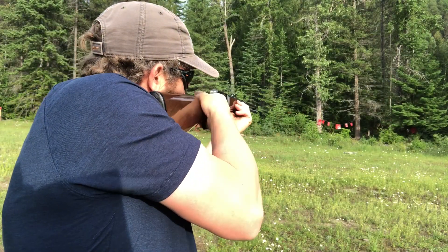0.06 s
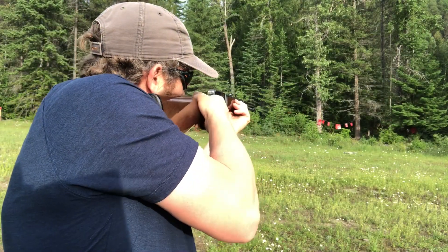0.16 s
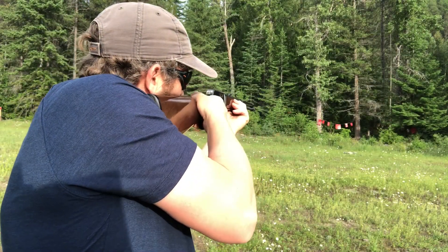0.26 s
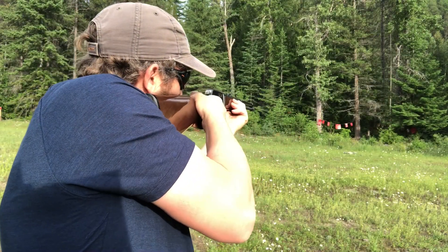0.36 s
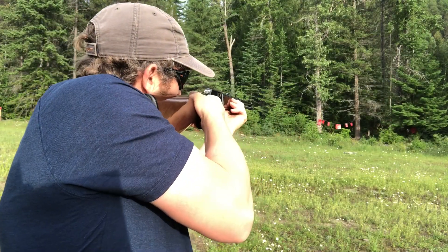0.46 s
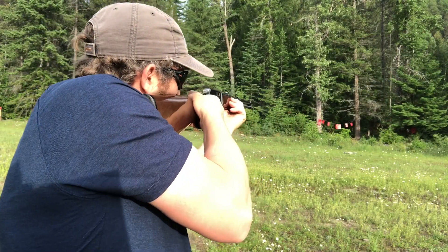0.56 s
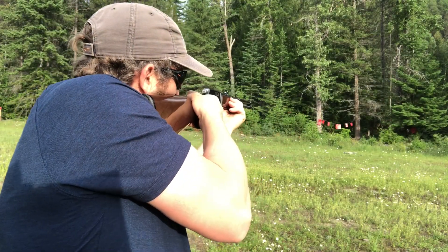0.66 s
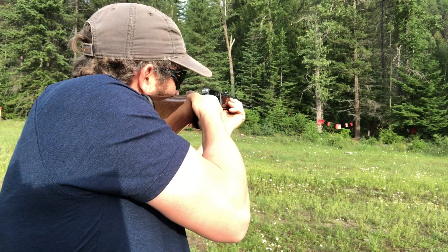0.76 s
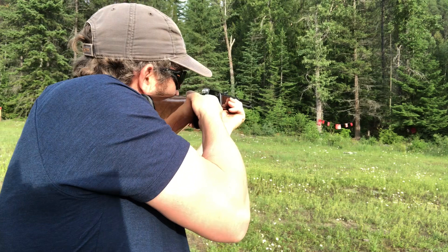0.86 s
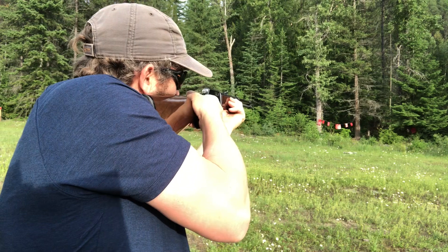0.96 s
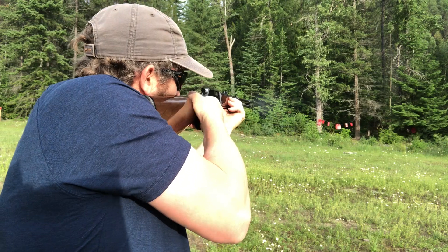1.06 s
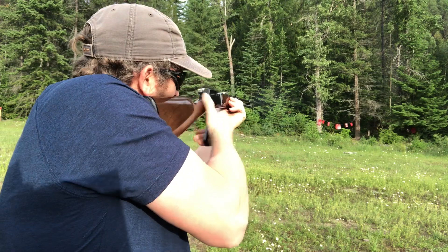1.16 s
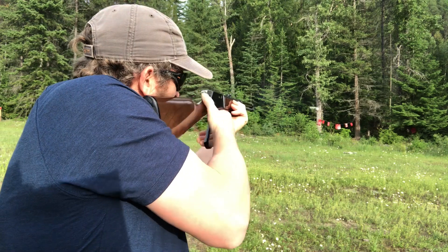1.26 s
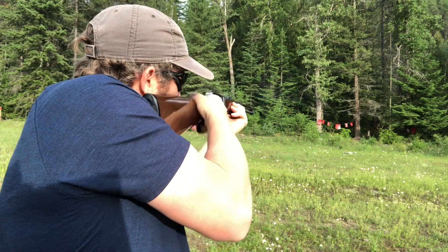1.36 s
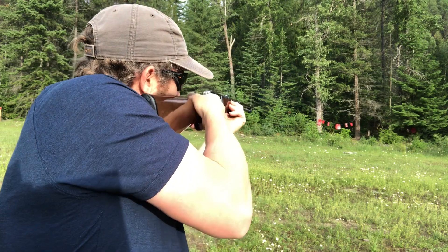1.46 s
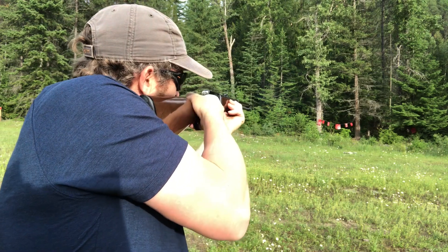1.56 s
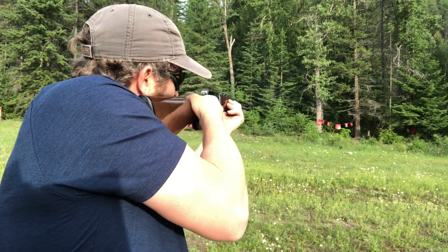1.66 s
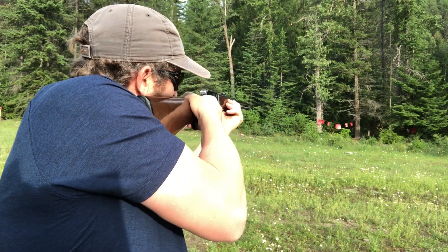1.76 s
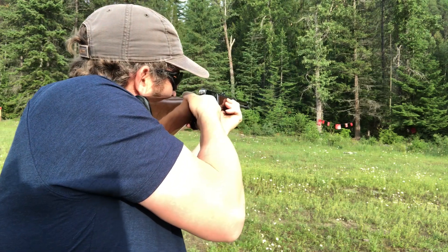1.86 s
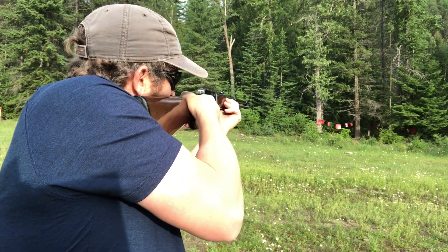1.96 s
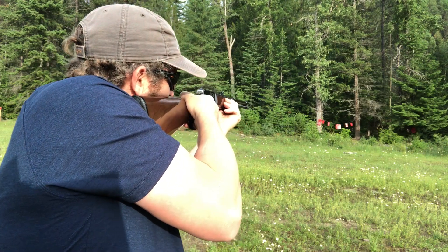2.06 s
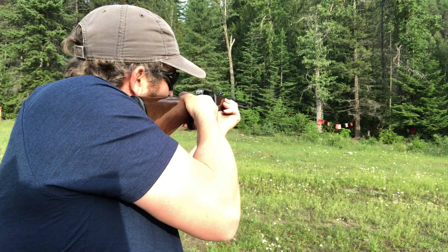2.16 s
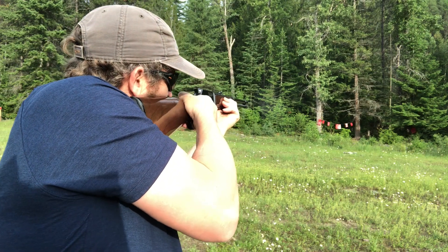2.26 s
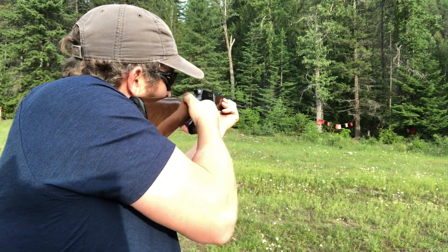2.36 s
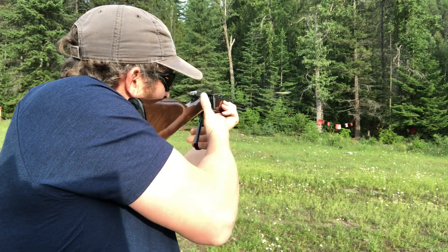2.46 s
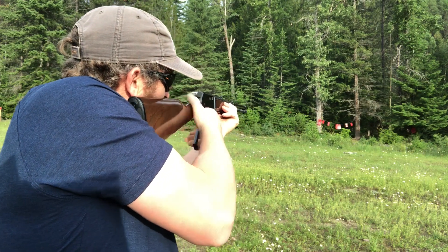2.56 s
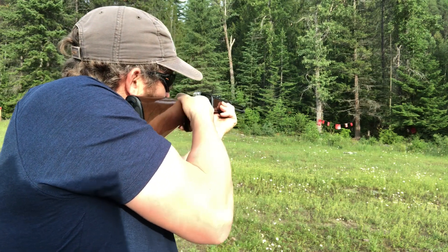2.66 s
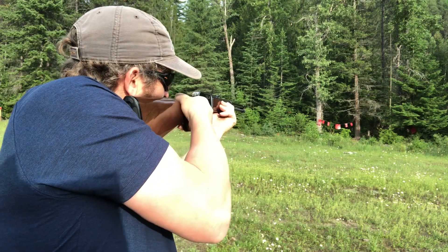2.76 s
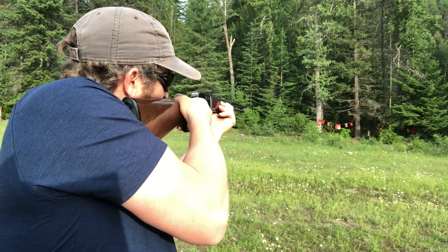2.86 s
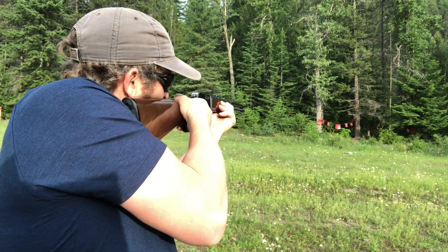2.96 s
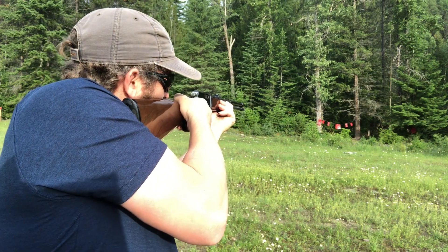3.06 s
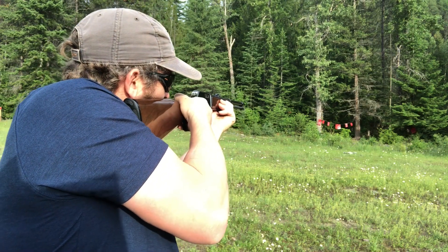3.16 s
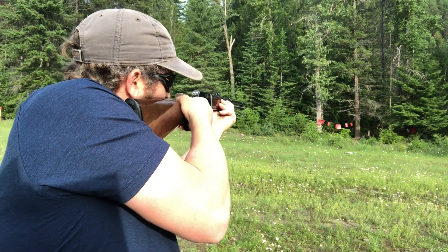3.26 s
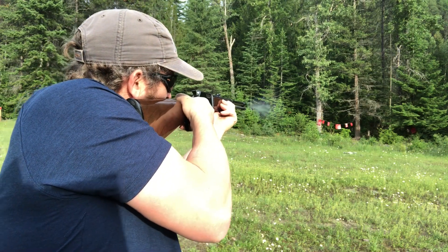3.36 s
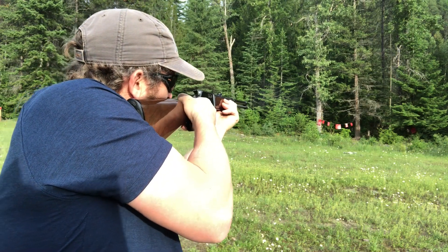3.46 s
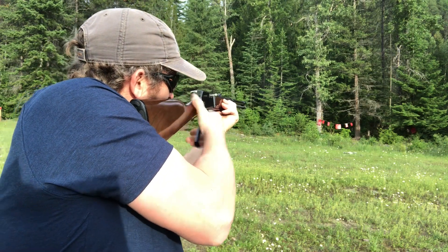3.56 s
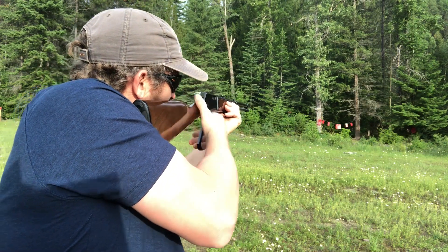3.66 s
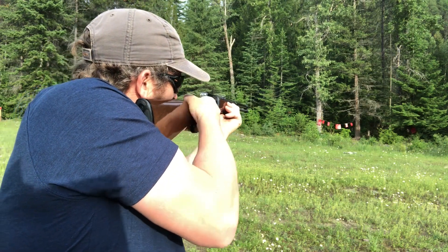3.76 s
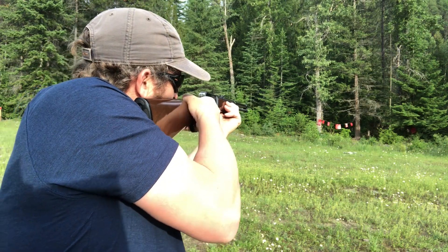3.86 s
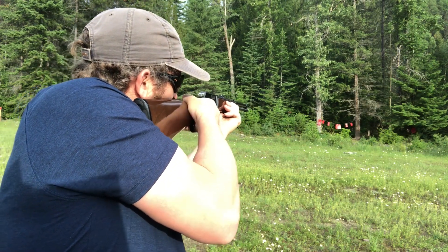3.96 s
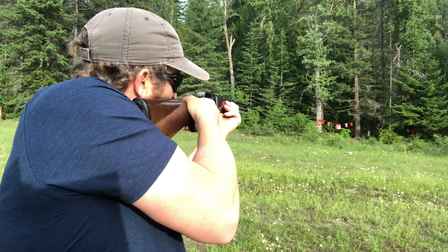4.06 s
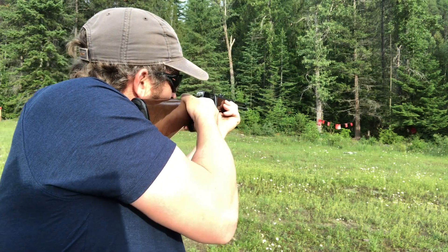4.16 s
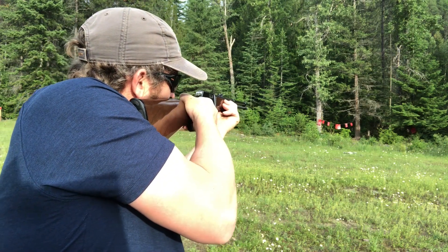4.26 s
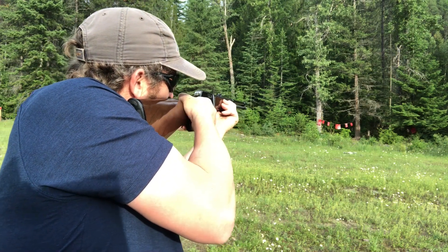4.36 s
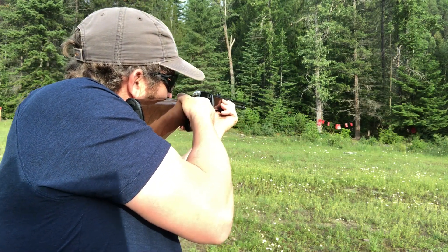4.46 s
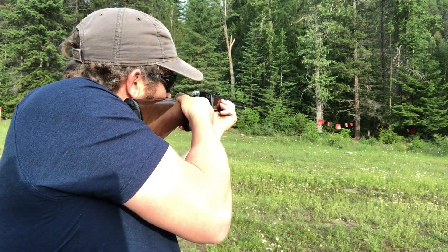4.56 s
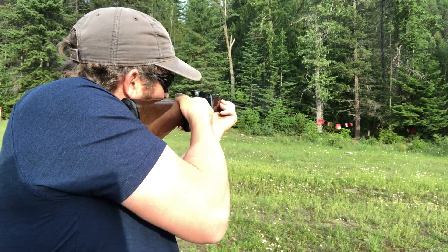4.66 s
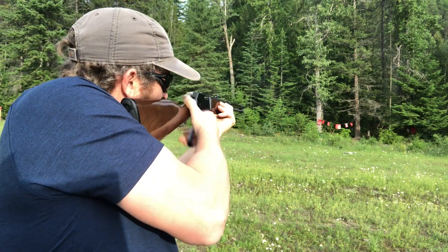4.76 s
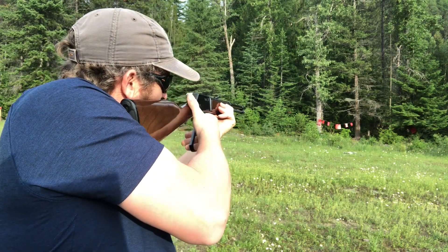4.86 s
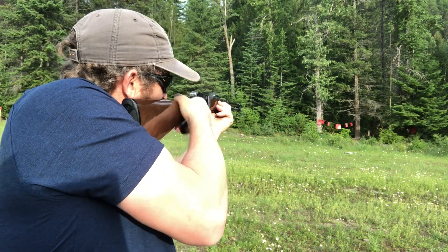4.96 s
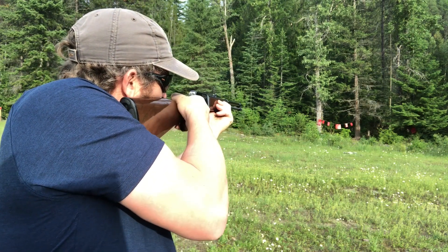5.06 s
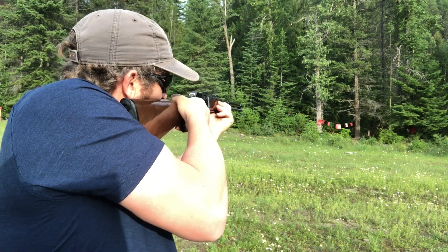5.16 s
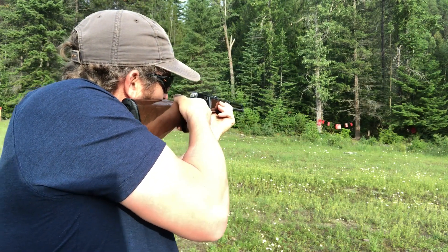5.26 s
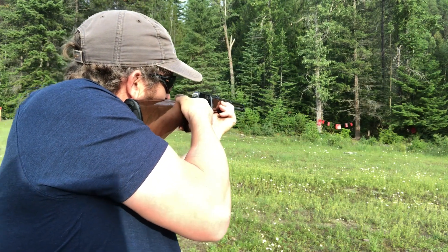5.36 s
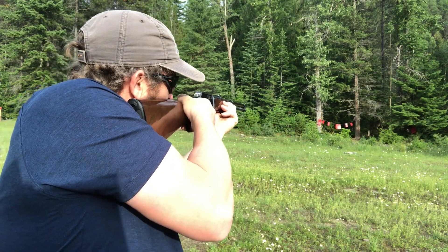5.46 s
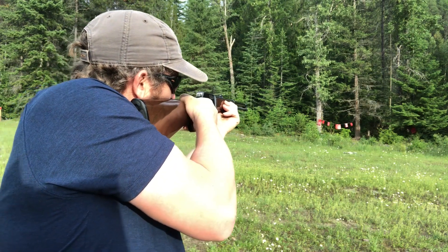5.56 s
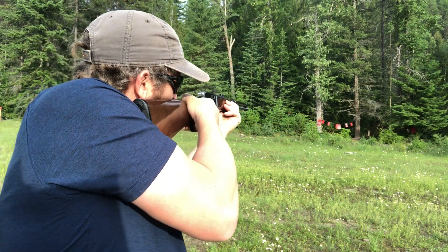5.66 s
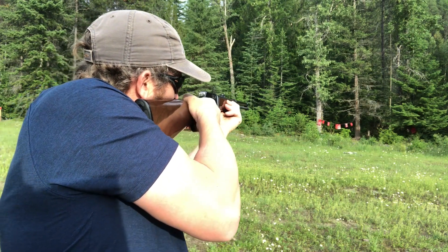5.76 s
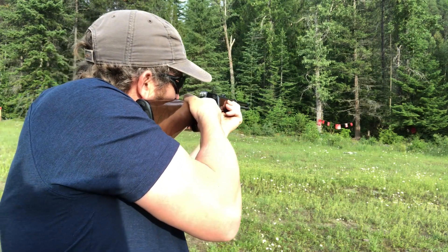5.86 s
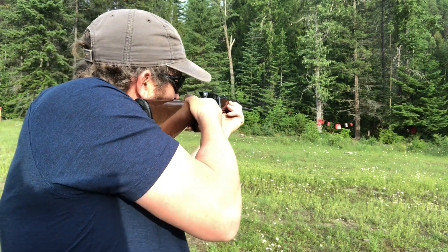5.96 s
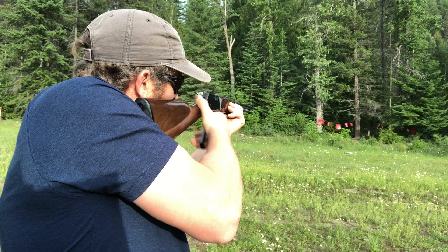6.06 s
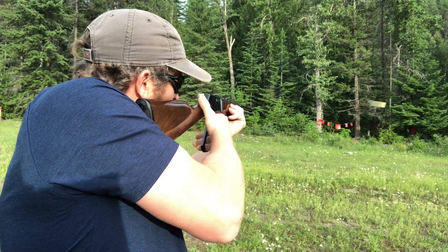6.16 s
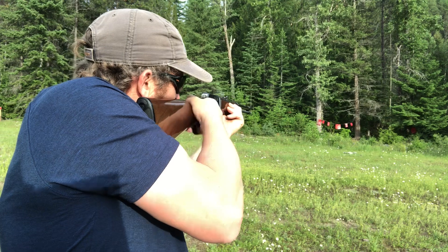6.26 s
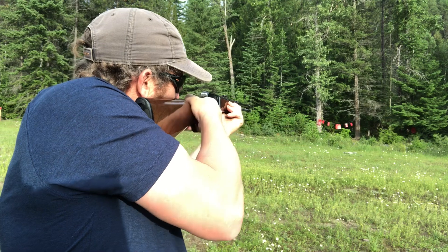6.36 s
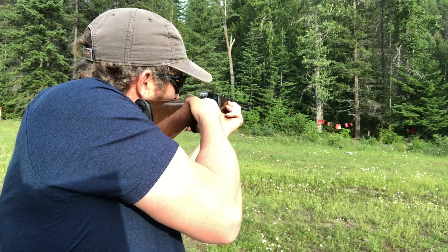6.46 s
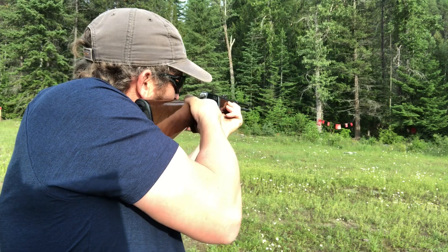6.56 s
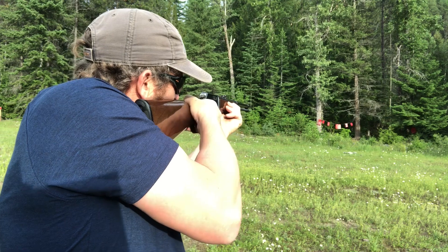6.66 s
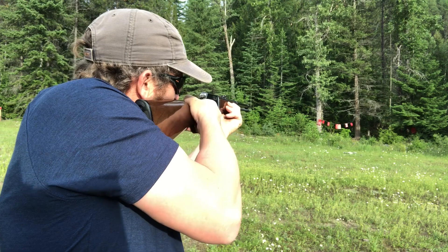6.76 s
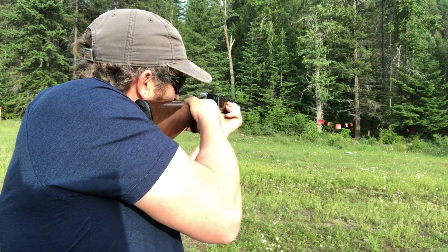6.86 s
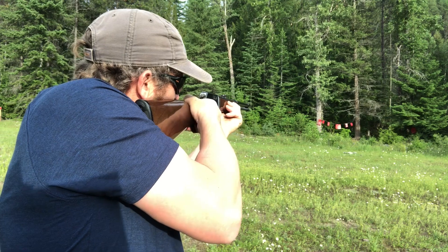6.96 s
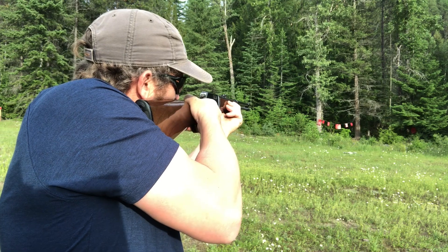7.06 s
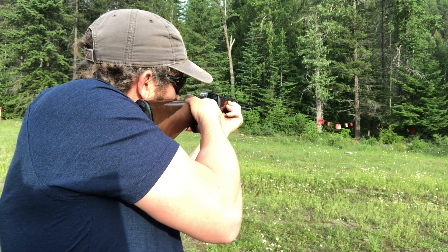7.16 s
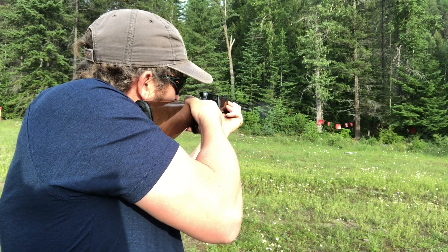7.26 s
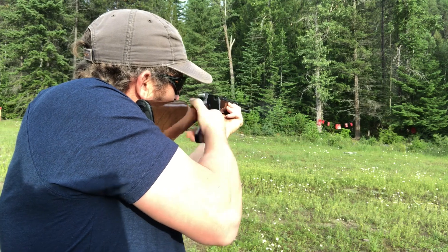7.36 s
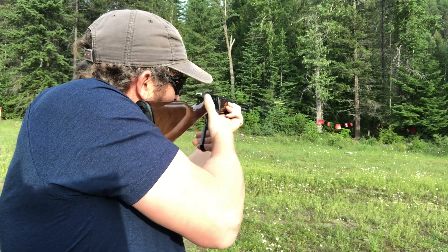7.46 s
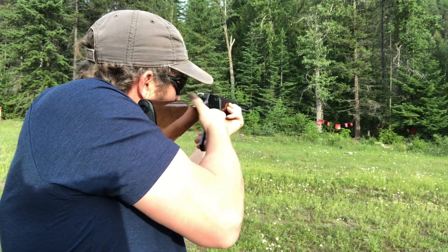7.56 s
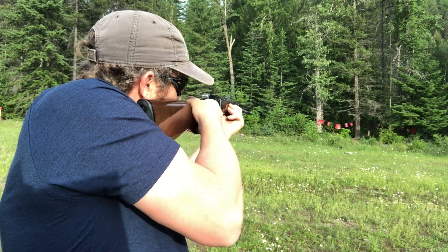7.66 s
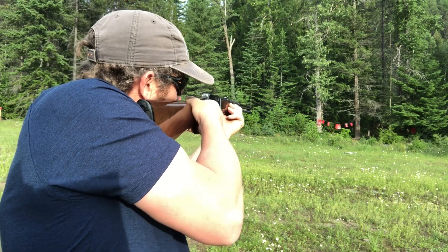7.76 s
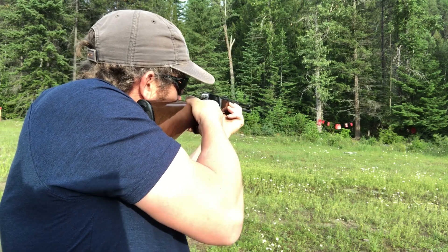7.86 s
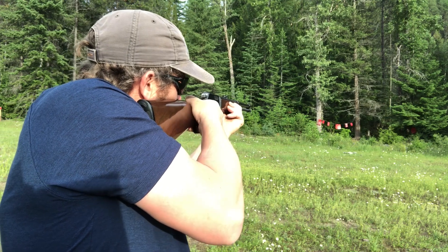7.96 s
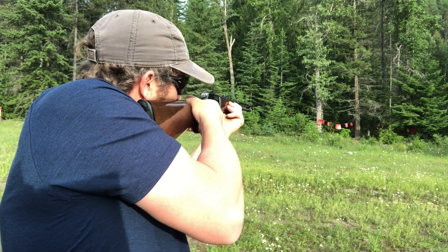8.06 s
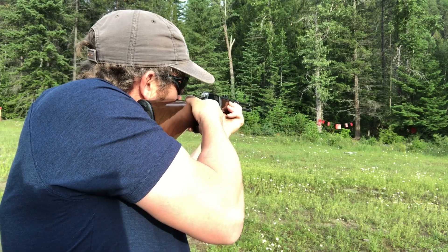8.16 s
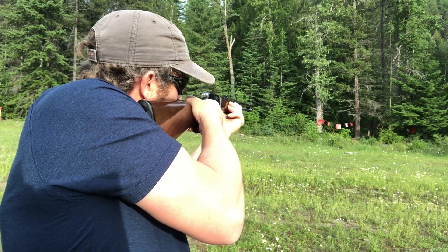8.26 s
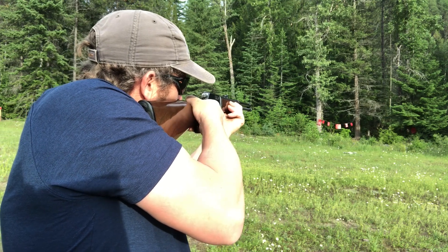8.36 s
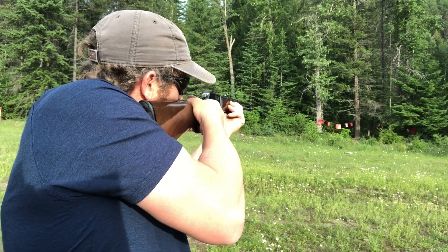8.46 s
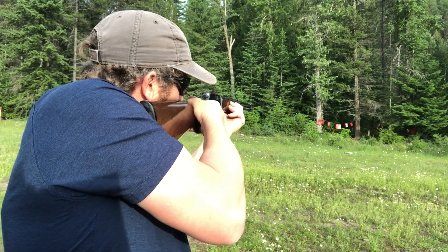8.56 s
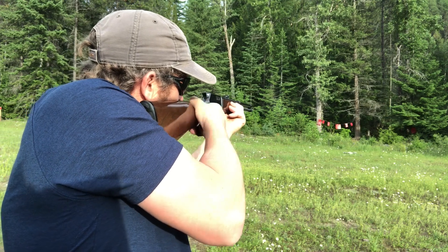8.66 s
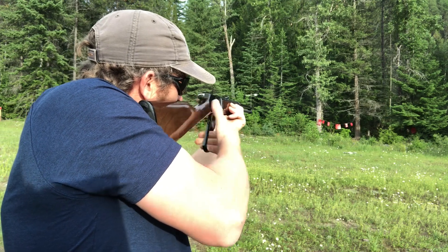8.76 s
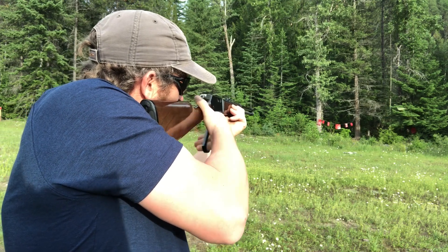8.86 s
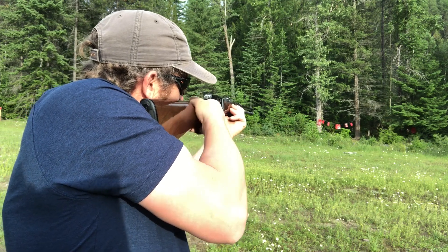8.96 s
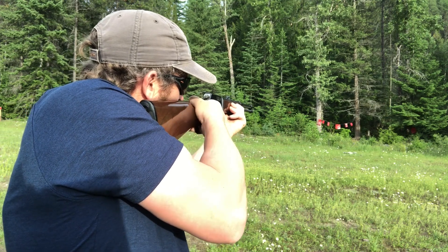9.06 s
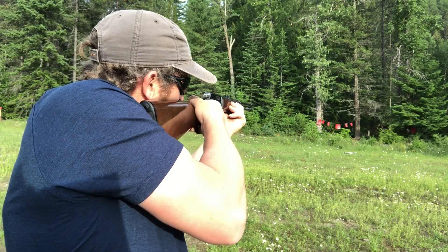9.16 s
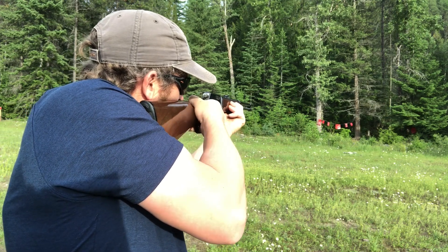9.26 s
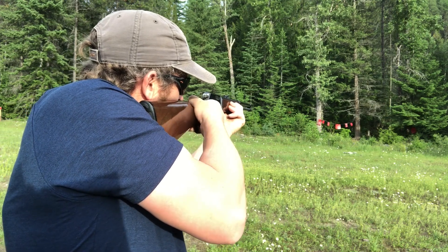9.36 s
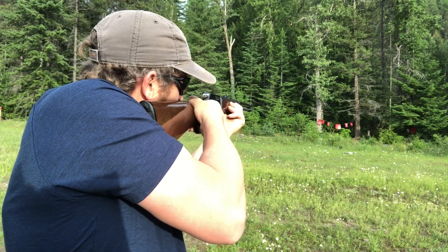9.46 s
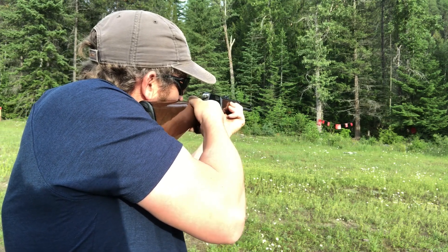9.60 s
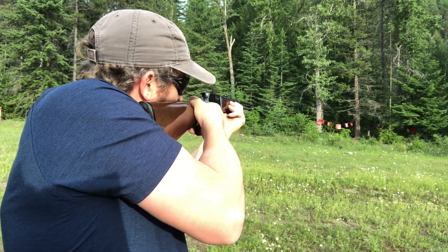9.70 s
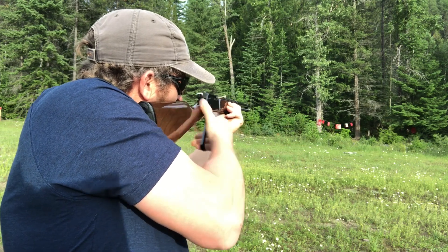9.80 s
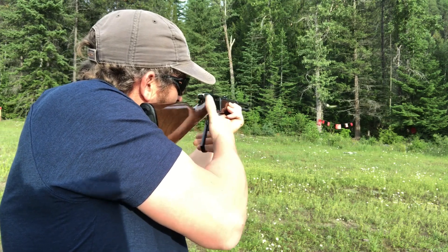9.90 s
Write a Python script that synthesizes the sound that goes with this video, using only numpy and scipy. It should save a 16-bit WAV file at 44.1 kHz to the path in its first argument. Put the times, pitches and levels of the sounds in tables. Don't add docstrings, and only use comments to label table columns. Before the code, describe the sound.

The opening catches the fading echo and plate ring of an earlier shot, with small dull knocks. Then eight light rifle cracks follow at an even pace, each with a short low thump, woody echoes from the forest edge, a bright metallic target hit, and a quick two-part lever clatter. Outdoors on a lawn, close microphone behind the shooter, automatic gain ducking each blast; soft hiss and insects underneath.

```python
import sys
import numpy as np
from scipy import signal
from scipy.fft import rfft, irfft, next_fast_len
from scipy.io import wavfile
from scipy.ndimage import uniform_filter1d

SR = 44100
rng = np.random.default_rng(int(sys.argv[2]) if len(sys.argv) > 2 else 0)


def to_wav(sig):
    pcm = np.clip(np.atleast_2d(sig), -1, 1) * 32767
    pcm = np.round(pcm).astype(np.int16)
    wavfile.write(sys.argv[1], SR, pcm.T)


def attenuation_scalar(level_db):
    decades = np.asarray(level_db, float) / 20
    return 10 ** decades


N = 437906

# (time [s], gas jet level [dB], low push level [dB], stock shake level [dB])
SHOT_TIMES = [
    (-.38, -16, -7, -14),
    (1.0568, -13, -3.5, -18),
    (2.2357, -12, -7, -23.5),
    (3.3859, -12, -18, -23.5),
    (4.6147, -11.5, -11.5, -25),
    (5.907, -12, -3, -25),
    (7.263, -11.5, -2, -17),
    (8.6042, -12, -2.5, -21),
    (9.644, -9, -2.5, -19),
]


def evened(x):
    return x / np.sqrt(np.mean(x ** 2) + 1e-20)


def read(points, hz):
    f, value = np.transpose(points)
    return np.interp(np.log(hz + 1), np.log(f + 1), value)


def add(mix, s, sound):
    at = round(s * SR)
    sound = sound[max(-at, 0):]
    part = mix[max(at, 0):][:len(sound)]
    part += sound[:len(part)]


def coloured(x, points):
    size = next_fast_len(len(x))
    gain = attenuation_scalar(read(points, np.fft.rfftfreq(size, 1 / SR)))
    return irfft(rfft(x, size) * gain, size)[:len(x)]


def resonate(x, hz, width_hz):
    turn = np.exp(2j * np.pi * hz * np.arange(len(x)) / SR)
    r = np.exp(-np.pi * width_hz / SR)
    return 2 * (turn * signal.lfilter([1 - r], [1, -r], x / turn)).real


def resonate_twice(x, hz, width_hz):
    return evened(resonate(resonate(x, hz, width_hz), hz, width_hz))


def swell(t, rise, t60):
    t = np.maximum(t, 0)
    return (1 - np.exp(-t / rise)) * attenuation_scalar(-60 * t / t60)


def meadow():
    # (frequency [Hz], level [dB per Hz])
    hush = [(25, -32.5), (70, -8.5), (200, -12.5), (600, 5), (4000, -20.5), (8000, -30.5), (16000, -41.5)]
    hush_db, insect_db, insect_hz = -57, -91, 7980
    chorus_s, chorus_width_s, chorus_db = 5.55, .45, 13.5
    insect = resonate_twice(rng.standard_normal(N), insect_hz, 90)
    insect *= np.exp(.5 * evened(uniform_filter1d(rng.standard_normal(N), size=9000)))
    insect *= attenuation_scalar(chorus_db * np.exp(-((np.arange(N) / SR - chorus_s) / chorus_width_s) ** 2))
    air = evened(coloured(rng.standard_normal(N), hush))
    return attenuation_scalar(hush_db) * air + attenuation_scalar(insect_db) * insect


def knock(db, start_hz, end_hz):
    t = np.arange(1200) / SR
    hz = end_hz + (start_hz - end_hz) * np.exp(-t / 0.00146)
    t60 = min(.034, 61 / end_hz)
    tone = np.sin(2 * np.pi * np.cumsum(hz) / SR) * swell(t, 0.00036, t60)
    grit = rng.standard_normal(1200)
    for _ in range(3):
        grit = resonate(grit, start_hz, start_hz)
    low_cut = signal.butter(2, 200, "high", fs=SR, output="sos")
    return attenuation_scalar(db) * signal.sosfilt(low_cut, tone + 1.4 * grit * swell(t, 0.00034, 0.017))


def click(fizz_db, body_db, thump_db):
    # (frequency [Hz], width [Hz], level [dB])
    receiver = [(3500, 1200, 4), (5550, 720, 3), (8000, 1100, -16.5), (1200, 1200, 2)]
    t = np.arange(2000) / SR
    noise = rng.standard_normal((3, 2000))
    chance = noise[2]
    fizz = resonate(noise[0], 11800 + 1500 * np.clip(chance[9], -2, 2), 6000)
    fizz = fizz * (1.7 * swell(t, .0004, 0.012) + 0.2 * swell(t, .003, 0.07))
    body = sum(attenuation_scalar(db + 1.5 * part) * evened(resonate(noise[1], hz, width))
               for (hz, width, db), part in zip(receiver, chance[1:]))
    body = body * 1.3 * (swell(t, 0.001, 0.013) + 0.1 * swell(t, .003, .05))
    thump = swell(t, 0.0021, 0.097) * np.sin(2 * np.pi * 110 * t * np.exp(0.41 * chance[0]))
    steel = attenuation_scalar(fizz_db + 0.7) * fizz + attenuation_scalar(fizz_db + body_db - 3.0) * body
    steel = signal.sosfilt(signal.butter(2, 600, "high", fs=SR, output="sos"), steel)
    return steel + attenuation_scalar(thump_db + 3.0) * thump


def action():
    # (time from the blast [s], fizz level [dB], steel body over fizz [dB])
    lock = [
        (-.0232, -56, 0.5),
        (-.0195, -41, 3.5),
        (-.0137, -52, 8),
        (-.0075, -42.5, 12.5),
    ]
    # (time [s], fizz
    # level [dB], steel body over fizz [dB])
    opening = [(1.148, -32, -8), (1.185, -27, 13), (1.181, -30, 13), (2.348, -31, -5), (2.371, -28, 4),
               (2.390, -31, 2), (2.408, -30, 7), (2.424, -29, 8), (3.490, -33, 9), (3.515, -39, 16),
               (3.523, -26, 5), (3.533, -38, 14.5), (3.545, -31.5, 8), (3.6085, -29, 12.5),
               (3.555, -29, 7.5), (3.571, -23, 9), (4.714, -35, -1), (4.72, -33.5, 7.5), (4.742, -33, 1),
               (4.748, -35, 8), (4.752, -38.5, 7), (4.762, -28, 7), (4.813, -39, 15), (4.7985, -16, 3.5),
               (6.011, -29, 0.5), (6.031, -40, 5.5), (6.041, -25.5, 5), (6.045, -26.5, 9), (6.062, -32, 7),
               (6.093, -23, 8.5), (7.400, -33, 11), (7.377, -28, -5), (7.409, -35, 8), (7.421, -29, 5),
               (7.424, -27, 9), (7.432, -31, 3), (8.733, -27, -8), (8.740, -33, 7), (8.750, -41, 2),
               (8.758, -37, 0), (8.771, -24.5, 7), (8.781, -27, 6), (9.781, -30.5, -7), (9.798, -39, 5.5),
               (9.827, -24.5, 3)]
    # (start [s], length [s], fizz level [dB], thump at start [dB], thump at end [dB])
    closing = [
        (-.03, .052, -35, -70, -70),
        (1.345, .052, -41, -68, -46),
        (2.6025, .049, -41, -66, -64),
        (3.731, .0504, -41, -43, -62),
        (4.9474, .0542, -40, -69, -72),
        (6.243, .0587, -43, -39, -53),
        (7.6254, .0536, -46, -57, -64),
        (8.931, .0475, -44, -41, -54),
    ]
    # (share of the stroke [1], fizz over the stroke's level [dB], steel body over fizz [dB])
    catches = [
        (-.9, -16, 11),
        (0, -1, 6),
        (.28, 1, 8),
        (.43, -5, 14),
        (.67, -8, 15),
        (.97, -3, 10),
        (1.05, -5, 10),
        (1.2, -18, 13),
    ]
    slip_share, spread_db = .02, 1.5
    out = np.zeros(N)
    locks = [(shot[0] + s, *steel) for shot in SHOT_TIMES for s, *steel in lock]
    for s, *steel in opening + locks:
        add(out, s, click(*steel, -99))
    for start, length, stroke_db, first_db, last_db in closing:
        chances = rng.standard_normal((len(catches), 2))
        for (share, db, body_db), (slip, spread) in zip(catches, chances):
            thump_db = np.interp(share, (-1, 0, 1, 2), (-99, first_db, last_db, -99))
            share += slip_share * slip * (share % 1 > 0)
            fizz_db = stroke_db + db + spread_db * spread
            add(out, start + share * length, click(fizz_db, body_db, thump_db))
    return out


def rings(number):
    # (strike number [1], frequency [Hz], level [dB], t60 [s])
    hums = [(0, 564, -46, 12.5), (0, 851, -37, 2.3), (0, 1459, -38, 1.9), (1, 255, -65, 12),
            (1, 564, -45, 12), (1, 851, -40, 2.6), (1, 1254, -30, 1.3), (1, 1459, -30, 2.1),
            (2, 878, -36, 2.5), (2, 1253, -28.5, 1.4), (3, 255, -64, 8), (3, 564, -49.5, 8),
            (3, 878, -33, 1.5), (3, 1254, -24, 1.25), (3, 2100, -21, .3), (4, 255, -54, 11),
            (4, 851, -21.5, 1.5), (4, 2100, -17, .33), (4, 2344, -16, .26), (5, 255, -59, 12),
            (5, 564, -48, 24), (5, 2098, -19, .39), (5, 3608, -16, .12), (6, 255, -63, 10),
            (6, 2347, -23, .55), (6, 2997, -38, 1.1), (7, 255, -63.5, 8), (7, 564, -49, 11),
            (7, 878, -40.5, 2), (7, 2099, -14, .25), (7, 2992, -35, .8)]
    # (strike number [1], frequency [Hz], level [dB], t60 [s])
    sparks = [(1, 8796, -23, .12), (1, 9049, -21, .11), (1, 9733, -24, .09), (1, 10785, -23, .1),
              (1, 13860, -27, .08), (2, 3068, -17, .12), (2, 3898, -22, .3), (2, 5087, -13, .07),
              (2, 5346, -18, .15), (2, 10650, -17, .05), (3, 7687, -21, .2), (3, 9340, -25, .2),
              (3, 10785, -21, .17), (4, 7690, -22, .14), (4, 9092, -19, .11), (4, 9469, -18, .1),
              (4, 11545, -28, .11), (4, 12750, -21, .07), (5, 7687, -26, .15), (5, 9744, -26, .09),
              (5, 10449, -26, .3), (5, 13995, -35, .22), (6, 3608, -19, .11), (6, 5017, -22, .19),
              (6, 6603, -22, .19), (6, 7684, -24, .11), (6, 8800, -29, .13), (6, 9340, -29, .14),
              (7, 9469, -29, .15), (7, 10449, -36, .36), (7, 11203, -31, .24), (8, 5852, -28, .25),
              (8, 6907, -28, .2), (8, 7617, -22, .12), (8, 8800, -26, .12), (8, 10449, -28, .36),
              (8, 10650, -25, .12), (8, 11545, -25, .1)]
    # (strike number [1], frequency [Hz], level [dB])
    pings = [(1, 5017, -25), (1, 10449, -11.5), (1, 11203, -23), (1, 12068, -20), (1, 12498, -25),
             (1, 14666, -30), (2, 6603, -21), (2, 7617, -22), (2, 8036, -14), (2, 8525, -30),
             (2, 11203, -18), (3, 5017, -24), (3, 7617, -23), (3, 8036, -13), (3, 8525, -13),
             (3, 10449, -25), (3, 11203, -31), (4, 3608, -26), (4, 8036, -10), (4, 8525, -16),
             (4, 10785, -20), (5, 8525, -14), (5, 10449, -30), (5, 13995, -32), (6, 6221, -19),
             (6, 8036, -36), (6, 10785, -40), (6, 13995, -33), (6, 11203, -27), (6, 14666, -55),
             (6, 10449, -30), (7, 5017, -17), (7, 8525, -27), (8, 6603, -16), (8, 8036, -16),
             (8, 10449, -26)]
    # (frequency [Hz], t60 [s], usual level [dB])
    high_modes = [(3608, .25, -40), (5017, .28, -34), (6221, .25, -32), (6603, .22, -38), (7617, .23, -38),
                  (8036, .13, -24), (8525, .25, -38), (10449, .24, -35), (10785, .17, -30),
                  (11203, .19, -28), (12068, .12, -50), (12498, .17, -46), (13995, .17, -44),
                  (14666, .17, -45)]
    favoured = {hz: db for strike, hz, db in pings if strike == number}
    spread_db = 1.5 * rng.standard_normal(len(high_modes))
    bright = [(hz, favoured.get(hz, db + part), t60) for (hz, t60, db), part in zip(high_modes, spread_db)]
    return [row[1:] for row in hums + sparks if row[0] == number] + bright


def plate(s, smack_db, until, modes):
    # (frequency [Hz], level [dB])
    splash_colour = [(300, -41.5), (800, 0.5), (1500, -0.5), (5000, 4), (8000, 2.5), (11000, -3.5),
                     (13000, -6.5), (16000, -18)]
    twin_hz, beats_per_s = 1459, .9
    prompt_hz = 7500
    settle_s, first_ring = 0.011, 0.24
    t = np.arange(round((until - s) * SR)) / SR
    splash = evened(coloured(rng.standard_normal(len(t)), splash_colour)) * np.minimum(t / 0.00036, 1)
    splash *= swell(t, 0.00012, 0.014) + 0.23 * swell(t, 0.0011, 0.14)
    out = attenuation_scalar(smack_db) * splash

    faint_hz, size, phase = rng.uniform(0, 1, (3, 40, 1))
    faint_hz = 900 + 11000 * faint_hz ** 2.2
    head = t[:3500]
    faint = attenuation_scalar(-14 * size - 60 * head / .25) * np.sin(2 * np.pi * (faint_hz * head + phase))
    fade = np.cos(np.linspace(0, np.pi / 2, len(head)))
    add(out, 0, attenuation_scalar(smack_db - 20.0) * faint.sum(0) * fade)

    for hz, db, t60 in modes:
        t = np.arange(round(min(until - s, 1.2 * t60) * SR)) / SR
        wander = uniform_filter1d(rng.standard_normal(len(t)), min(2500, round(2500 * t60)))
        shiver = attenuation_scalar(2 / (1 + t60) * evened(wander))
        if abs(hz - twin_hz) < 5:
            shiver = shiver * 1.5 * np.cos(np.pi * beats_per_s * t)
        envelope = swell(t, 4 / hz, t60)
        if hz <= prompt_hz:
            envelope = first_ring * envelope + swell(t - settle_s, .004, t60)
        add(out, 0, attenuation_scalar(db - 1) * envelope * shiver * np.sin(2 * np.pi * hz * (t + s)))
    no_bass = signal.butter(3, 230, "high", fs=SR, output="sos")
    return signal.sosfilt(no_bass, out)


def trunks():
    lumps = np.exp(.2 * evened(uniform_filter1d(rng.standard_normal(2 * SR), 300)))
    streaks = attenuation_scalar(2.8 * evened(uniform_filter1d(rng.standard_normal(SR + 1), 50)))
    return evened(irfft(rfft(rng.standard_normal(2 * SR) * lumps) * streaks))


def field(same, later_db):
    # (delay [s], level [dB], t60 [s],
    # strongest frequency [Hz], fall-off [dB per octave])
    echoes = [(0.010996, -18.5, 0.063, 5992, 0), (0.019, -13.5, 0.23, 1859, 0.5),
              (0.028003, -27.5, 0.94, 10000, 12), (0.048493, -11, 0.061, 3500, 6.5),
              (0.04, -14, .25, 680, 11), (0.064, -24, 0.042, 860, 9.5), (.102, -20, .05, 893.6, 11.5),
              (0.12099, -23, 0.17, 5111, 5.5), (0.13826, -12.5, 0.024, 4030, 5),
              (0.18, -17.5, 0.08, 440, 5.5), (0.14664, -10, 0.015, 3800, 9.5),
              (0.14495, -16, 0.81, 5300, 5), (0.1691, -12.5, 0.12, 1700, 9.5),
              (.131, -23.5, .16, 7000, 14.5), (0.18701, -3.5, .045, 1100, 0), (0.18, -4.5, 0.032, 1661, 0),
              (0.20398, -11, 0.52, 2300, 0.5), (0.38, -14, 0.1, 3463, 5.5), (0.29, -28, 0.074, 1200, 2.5),
              (0.5253, -31.5, 0.54, 3700, 0.5), (0.36, -27.5, 0.13, 3400, 1), (0.3, -24.5, 2.366, 740, 2),
              (0.0618, -25.5, 0.35, 14000, 5), (.04, -14, .6, 330, 14)]
    # (frequency [Hz], loss [dB per s of travel])
    air = [(200, -8.5), (1000, -2.5), (2000, 6), (4000, 11.5), (8000, 36.5), (11000, 64), (16000, 100)]
    # (frequency [Hz], level [dB])
    ground = [(40, -38.5), (200, -22), (400, -14.5), (600, -2.5), (900, 1.04), (2300, 0.55), (2750, -5),
              (3200, -0.5), (3900, -4.5), (4400, -2), (8000, -6), (11000, -6.5), (16000, -10)]
    size = len(same)
    lumps = np.exp(0.43 * evened(uniform_filter1d(rng.standard_normal(size), 60)))
    fresh = evened(rng.standard_normal(size) * lumps)
    hz, t, z = signal.stft(0.81 * same + 0.53 * fresh, SR, nperseg=128, noverlap=96)
    octave = np.log2(np.maximum(hz, 300))[:, None]
    power = 0
    for s, db, t60, peak_hz, fall_db in echoes:
        level_db = db - fall_db * abs(octave - np.log2(peak_hz)) + later_db * (s > .165)
        rise = 0.0088 * t60 ** 0.5
        power = power + (attenuation_scalar(level_db) * swell(t - s, rise, t60)) ** 2
    patches = uniform_filter1d(rng.standard_normal(z.shape), size=3, axis=0)
    patches = uniform_filter1d(patches, size=24, axis=1)
    z = z * attenuation_scalar(3.3 * evened(patches) * (0.13 + 0.87 * np.exp(-t / .5)))
    z = z * np.sqrt(power) * attenuation_scalar(-read(air, hz)[:, None] * t)
    return attenuation_scalar(8.0) * coloured(signal.istft(z, SR, nperseg=128, noverlap=96)[1], ground)


def glints():
    # (delay [s], level [dB], frequency [Hz], length [ms])
    posts = [(0.023, -29.5, 7830, 2.0), (0.0234, -15.5, 2029, 1.5), (0.0255, -18.0, 900.0, 1.2),
             (0.03, -22.0, 3610.0, 2.5), (0.0316, -16, 1406, 3.5), (0.0327, -16.5, 601.2, 4.5),
             (0.0329, -19, 4500, 1.2), (0.039, -16, 943.5, 2.2), (0.0452, -15.5, 895, 1.5),
             (0.0508, -21, 2345, 2.2), (0.0534, -10, 3210, 1.7), (0.0521, -15.0, 680, 4.2),
             (0.055, -23, 7040, 4.5), (0.0629, -20.5, 2214, 6.0), (0.0737, -33, 592, 1.5),
             (0.0818, -34.5, 950.0, 6.2), (0.087, -24, 1088, 3.2), (0.1033, -24.5, 950.0, 2.4),
             (0.1063, -35, 6310.0, 2.2), (0.1072, -21.5, 1055, 2.8), (0.1125, -27.5, 492, 7.3),
             (0.1382, -34, 6800, 3.2), (0.1387, -19, 5190, 3.2), (0.1389, -23.5, 7820, 4.1),
             (0.137, -19.5, 3100, 3.0), (0.1397, -25, 2260.0, 1.7), (0.1486, -16.5, 2160, 1.5),
             (0.1596, -19.5, 2336, 1.5), (0.163, -28.5, 515, 7.5), (0.172, -18.5, 2353, 5.0),
             (0.171, -17.0, 1740, 4.0), (0.188, -22, 4620, 4.0), (0.1891, -22.5, 6630, 2.2),
             (0.1902, -13.5, 1150.0, 2.2), (0.1908, -13.5, 2333, 3.0), (0.196, -38.5, 3307, 6.2),
             (0.1959, -19.5, 5160, 9.0), (0.1949, -18.0, 7920.0, 2.5), (0.1955, -15, 6620, 3.5),
             (0.1963, -22.5, 4732, 5.2), (0.199, -8.5, 1845, 2.2), (0.2, -9.5, 1114, 1.7),
             (0.2048, -21, 7860, 10.0), (0.2245, -13.5, 3670, 2.0), (0.2224, -13, 2300, 1.2),
             (0.232, -16, 2590, 1.5), (0.239, -16.5, 1145, 4.5), (0.2483, -14, 1600, 1.7),
             (0.2617, -22, 2060, 5.1), (0.2624, -26, 910, 3.6)]
    spread_db, detune_share = 0.5, 0.023
    out, t = np.zeros(SR // 3), np.linspace(-.02, .02, 1765)
    for (s, db, hz, ms), (spread, detune, phase) in zip(posts, rng.standard_normal((len(posts), 3))):
        tone = np.cos(2 * np.pi * hz * (1 + detune_share * detune) * t + phase)
        blip = np.exp(-(t / (.0006 * ms)) ** 2) * tone
        add(out, s - .02, attenuation_scalar(db + spread_db * spread) * blip)
    return out


def blast(jet_db, push_db, shake_db, slowness):
    # (frequency [Hz], level [dB per Hz])
    jet_colour = [(470, -41), (800, -0.5), (2730, -6), (3600, -4.5), (6910, -4), (11000, -11),
                  (13600, -13.5), (15200, -13), (16000, -26)]
    # (time [s], level [dB])
    burst = [
        (0, -31.5),
        (.0002, -0.5),
        (.0024, -2),
        (.0038, 2),
        (.0054, -1),
        (.0062, -19.5),
        (.0088, -23.5),
        (.0091, -3),
        (.0115, -25),
        (.014, -39.5),
    ]
    t = np.arange(8000) / SR - .02
    noise = rng.standard_normal((2, 8000))
    jet = evened(coloured(noise[0], jet_colour)) * attenuation_scalar(np.interp(t, *np.transpose(burst), -99, -99))

    beats = 520 * (t - .0064) - 9000 * (t - .0064) ** 2
    ring = -swell(t - .005, 0.0008, 0.018) * np.cos(2 * np.pi * beats) * (t < .02)

    u = t / slowness
    turns = 42 * u - 2.3 * np.exp(-u / .015) - 2.5 * np.exp(-u / .004) - .507
    size = np.exp(-((u - .027) / .012) ** 2) + .45 * np.exp(-((u - .0115) / .005) ** 2)
    swing = swell(t - .006, .002, 9) * size * np.cos(2 * np.pi * turns)
    swing += .045 * swell(t - .035, .02, .24) * resonate_twice(noise[1], 42, 40)
    swing *= attenuation_scalar(18 * (1 - slowness))
    swing += 0.21 * swell(t - .006, 0.0053, 0.14) * resonate_twice(noise[0], 300, 310)

    steel = sum(resonate_twice(noise[1], hz, 450) for hz in (3500, 8000))
    wood = np.sin(2 * np.pi * (510 * t + rng.random())) + 1.3 * resonate_twice(noise[1], 630, 400)
    growth = np.exp(np.minimum(t, 0) / 0.022) * (t < .005)
    jolts = 0.29 * swell(t + 0.017, .001, 9) + 0.63 * swell(t + .0095, 0.00095, 9)
    stock = growth * jolts * (wood + 0.18 * steel)
    return attenuation_scalar(jet_db + 3.5) * jet + attenuation_scalar(push_db + 4) * ring + attenuation_scalar(-10) * swing + attenuation_scalar(shake_db) * stock


def scene():
    # (time [s], smack level [dB], plate's forest echo level [dB])
    strikes = [
        (-.185, -10, -4),
        (1.2532, -5, -3),
        (2.434, -2.5, -3),
        (3.5788, -4, 0),
        (4.809, -2.5, -1),
        (6.1025, -4, -1.5),
        (7.458, -12.5, -4),
        (8.7994, -5.5, -4),
        (9.8416, -4.5, -6),
    ]
    slowness = [1, .96, 1.06, .9, 1.02, .94, 1.005, 1.15, .995]
    # (time [s], level [dB], start pitch [Hz], end pitch [Hz])
    knocks = [(0.4259, -18.5, 1730, 574.4), (0.4273, -22, 460, 343), (0.488, -37, 1500, 694),
              (0.6465, -41.5, 3500, 2706), (0.648, -35, 500, 354), (0.648, -42, 1810, 1310),
              (0.885, -71, 9050, 5000), (1.6824, -71.5, 10770, 8900), (1.7714, -67, 12100, 8000),
              (4.0008, -34.5, 3500, 1500), (4.15, -25, 2404, 1625), (4.151, -36, 500, 328),
              (4.234, -71.5, 12300, 8950), (0.427, -35, 4700, 3820), (0.4885, -51, 4200, 3020),
              (0.6462, -65, 5000, 4030), (6.521, -36, 3864, 1980), (7.995, -49, 5440, 4800),
              (1.163, -33, 7900, 5500), (1.1765, -27, 5000, 3000), (1.2445, -23, 8000, 2500),
              (6.0535, -22, 3000, 2000), (4.15, -40, 1500, 1000)]
    mix, same = meadow() + action(), trunks()
    for s, *row in knocks:
        add(mix, s, knock(*row))
    ends = [row[0] for row in strikes[1:]] + [N / SR]
    for number, (s, *force) in enumerate(SHOT_TIMES):
        hit, smack_db, later_db = strikes[number]
        add(mix, hit, plate(hit, smack_db, ends[number], rings(number)))
        add(mix, s, field(same, later_db))
        add(mix, s, glints())
        add(mix, s - .02, blast(*force, slowness[number]))
    return mix[None]


def roll_off(x):
    return signal.sosfilt(signal.butter(12, 16990, fs=SR, output="sos"), x)


def record(dry):
    duck_db, recover_s = 11.5, 0.63
    t = np.arange(N) / SR
    since = np.min([np.where(t > s + .011, t - s, 99) for s, *_ in SHOT_TIMES], axis=0)
    ducked = dry / attenuation_scalar(uniform_filter1d(duck_db * np.exp(-since / recover_s), 100))
    edge = signal.firwin(191, 15900, window=("kaiser", 7), fs=SR)
    mix = signal.oaconvolve(np.tanh(ducked), edge[None], "same")
    return roll_off(mix)


dry = scene()
out = record(dry)
to_wav(out)
```